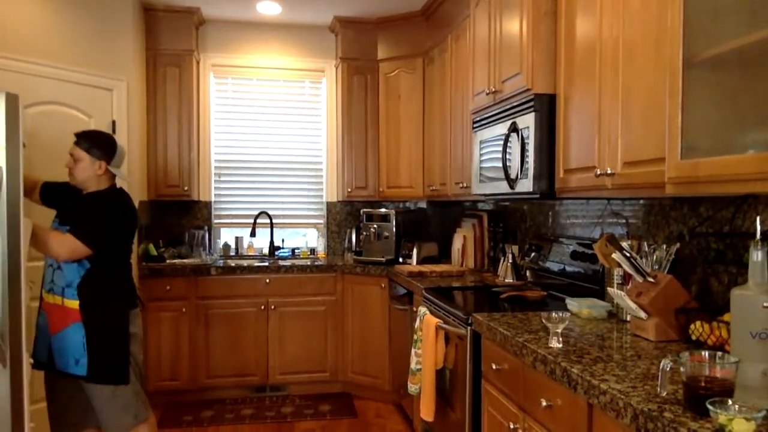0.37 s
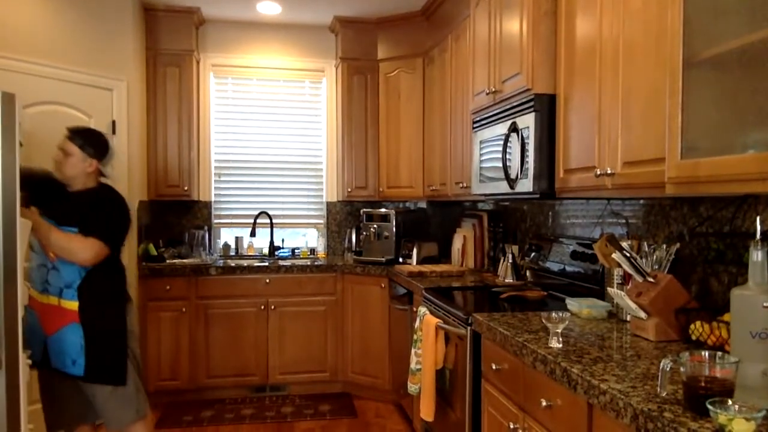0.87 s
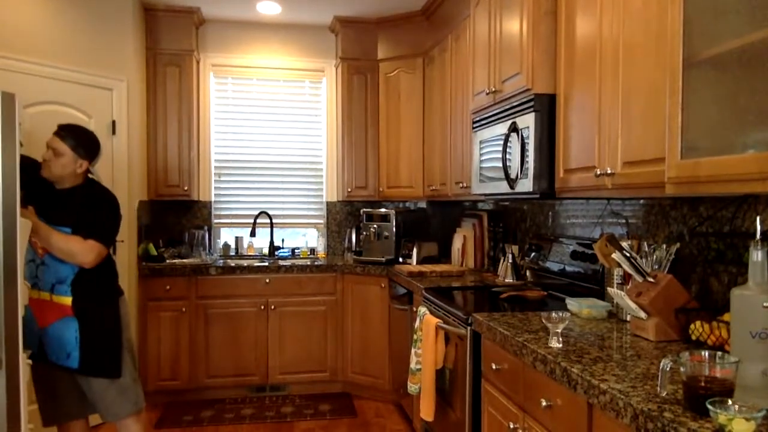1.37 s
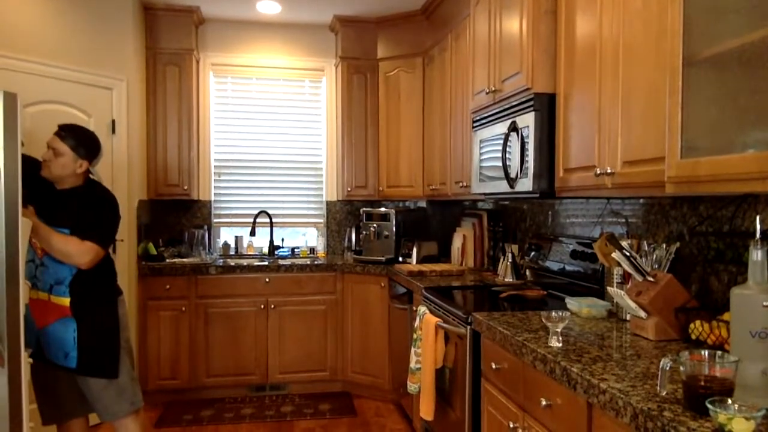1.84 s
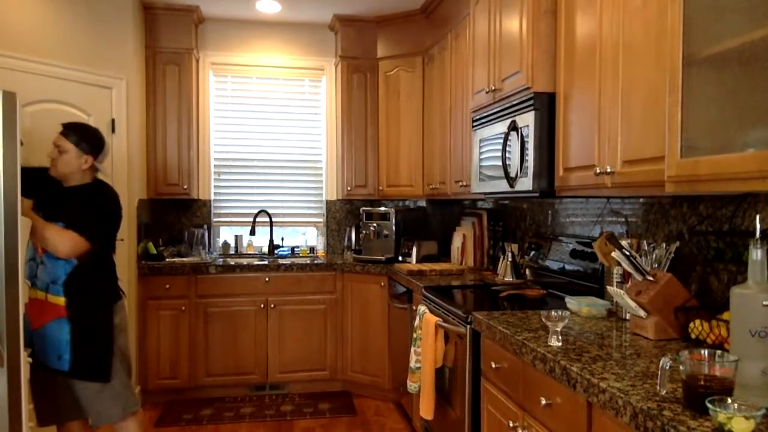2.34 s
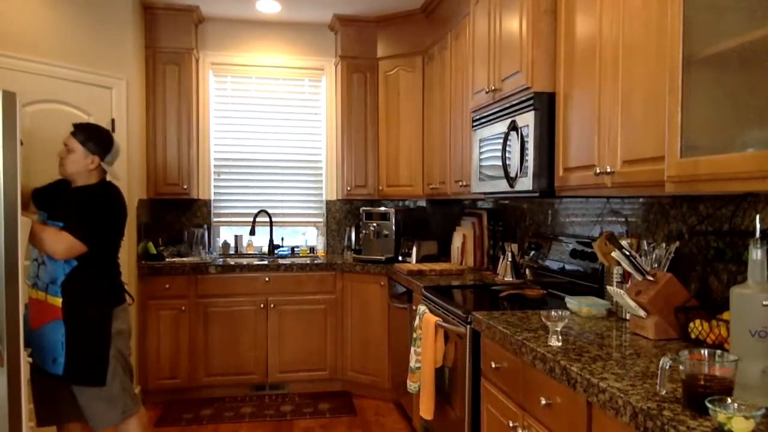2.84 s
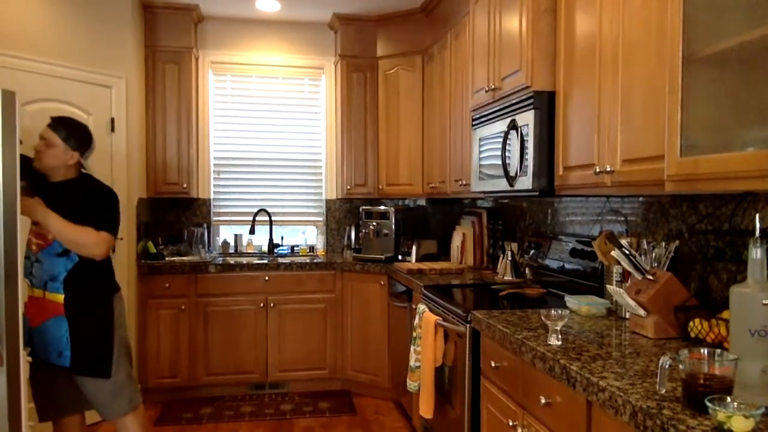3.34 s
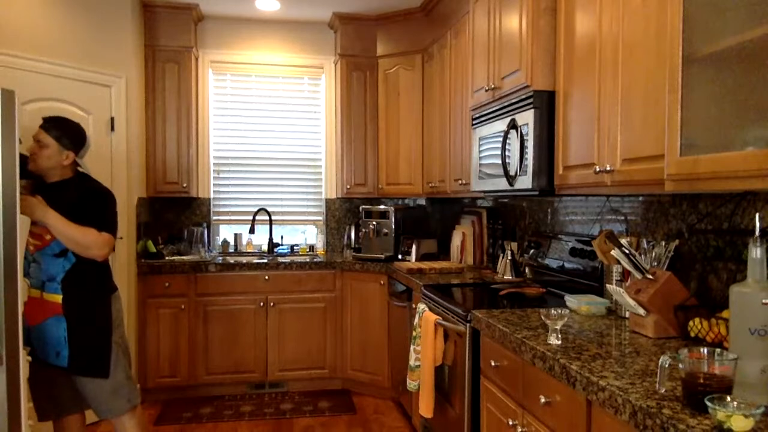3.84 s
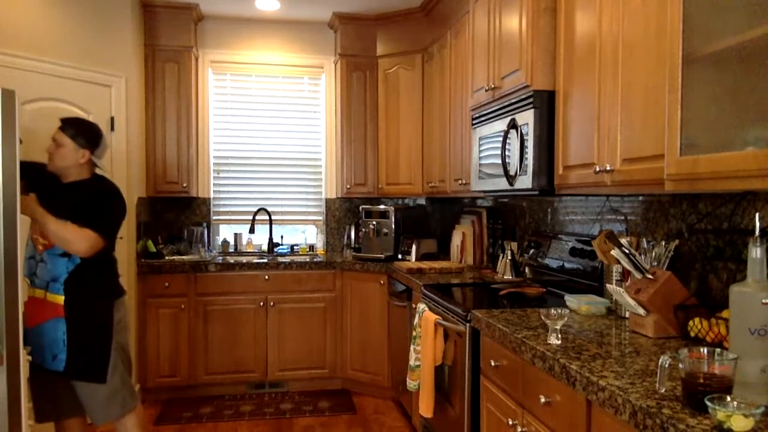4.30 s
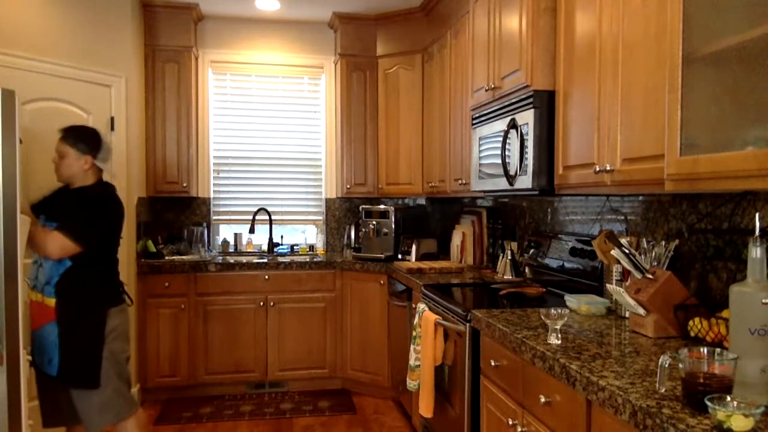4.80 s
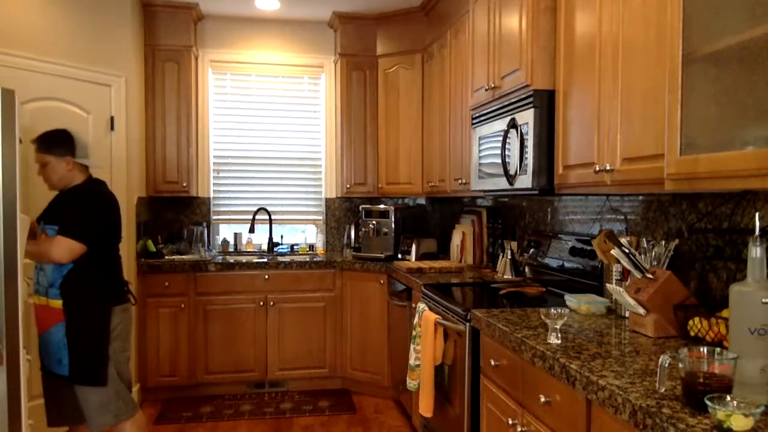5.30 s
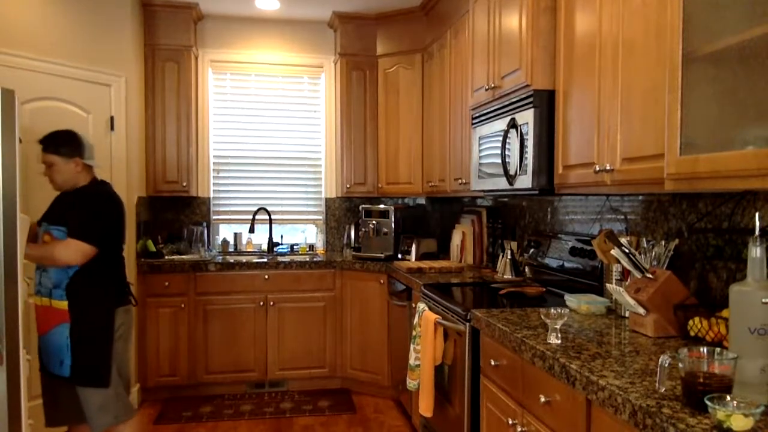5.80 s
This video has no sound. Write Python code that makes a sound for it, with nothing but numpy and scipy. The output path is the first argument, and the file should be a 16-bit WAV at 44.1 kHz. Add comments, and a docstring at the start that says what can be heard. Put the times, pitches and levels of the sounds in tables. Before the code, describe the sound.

In a hard home kitchen, a person at the freezer drops ice cubes into a metal shaker with sharp cracks and a short metallic ring. They rummage in the plastic bin with crunchy, knocking clatter, drop a few more, dig again, bump the bin, then drop a last handful. A distant microphone catches mostly room echo; the faint fridge hum is held down by noise suppression.

```python
"""In a hard kitchen, a hand digs ice cubes out of a plastic freezer bin and drops them into a steel tin.
A fridge hums as filtered noise. Cubes crack together and ring the tin's wall, base and air column.
Stirred ice is many tiny random contacts, with louder knocks on top, played through short resonances.
A distant mono microphone hears mostly room echoes; a noise suppressor cuts the tails and holds the hum down."""
import sys
import numpy as np
from scipy import signal
from scipy.fft import rfft, irfft
from scipy.io import wavfile
from scipy.ndimage import uniform_filter1d

SR = 44100
rng = np.random.default_rng(int(sys.argv[2]) if len(sys.argv) > 2 else 0)


def volts_from_db(level):
    """Convert decibel levels to linear amplitude ratios."""
    exponent = np.asarray(level, float) / 20
    return 10 ** exponent


def store_wav(level_fs):
    """Save 16-bit WAV to argv[1]."""
    pcm = np.round(np.clip(np.atleast_2d(level_fs), -1, 1) * 32767)
    wavfile.write(sys.argv[1], SR, pcm.T.astype(np.int16))


N = 272097   # length in samples

# how the suppressor treats each pitch: [f/Hz, threshold per analysis bin/dB, deepest cut/dB]
SUPPRESSOR_BANDS = [(149, -42, 13.5), (1080, -37, 12), (4020, -42, 20.5), (10000, -57.5, 19.5),
                    (16000, -58.5, 20)]


def at_hz(points, hz, column=1):
    """Reads a table between its rows, along a logarithmic pitch axis."""
    points = np.array(points)
    return np.interp(np.log(np.maximum(hz, 1)), np.log(points[:, 0]), points[:, column])


def in_time(tables):
    """Level over several spans; practically silent between them."""
    t, level = np.arange(N) / SR, np.full(N, -200.0)
    for s, db in map(np.transpose, tables):
        inside = (t >= s[0]) & (t <= s[-1])
        level[inside] = np.interp(t[inside], s, db)
    return level


def without_bass(x, hz):
    """Small bodies radiate little bass, so the lows are filtered off."""
    return signal.sosfilt(signal.butter(3, hz, "high", fs=SR, output="sos"), x)


def resonance(x, hz, width_hz):
    """A two-pole band that passes its middle pitch at about gain 1."""
    r = np.exp(-np.pi * width_hz / SR)
    feedback = [1, -2 * r * np.cos(2 * np.pi * hz / SR), r * r]
    return signal.lfilter([(1 - r * r) / 2, 0, (r * r - 1) / 2], feedback, x + 1e-18)


def ring(clicks, hz, t60):
    """A unit click starts a sine of about height 1, which falls by 60 dB in t60 seconds."""
    r, w = volts_from_db(-60 / (t60 * SR)), 2 * np.pi * hz / SR
    return signal.lfilter([0, np.sin(w)], [1, -2 * r * np.cos(w), r * r], clicks + 1e-18)


def fading(clicks, t60):
    """Each click jumps up at once, then falls by 60 dB in t60 seconds."""
    return signal.lfilter([1], [1, -volts_from_db(-60 / (t60 * SR))], clicks)


def grains(per_s, spread_db):
    """Random contacts of uneven size, scaled to an average (rms) level of 1."""
    sizes = volts_from_db(spread_db * np.minimum(rng.exponential(1, N), 3.0)) * rng.choice([-1, 1], N)
    x = sizes * (rng.random(N) < per_s / SR)
    return x / np.sqrt(np.mean(x ** 2) + 1e-20)


def spikes(seconds, db):
    """Single-sample clicks at the given times and levels."""
    x = np.zeros(N)
    x[np.round(np.asarray(seconds) * SR).astype(int)] = volts_from_db(db)
    return x


def clatter(colour, flow_db, flow_bright_db, knocks, knock_db, per_s, sharp):
    """Ice on ice: contacts are dealt out among short resonances; each knock is a noise burst on all of them."""
    knock_t60_s = 0.04                      # a knock is a short burst of contacts
    knock_spread_db, stir_spread_db = 1.5, 2.5   # no two cubes sound alike: random spread per band
    stir_colour_s = 0.06                    # time to drift from one random stir colour to the next
    bank_hz = np.geomspace(160, 16000, 28)
    s, level_db, bright_db = knocks

    contact, dealt = grains(per_s, spread_db=7.5), rng.integers(0, 7, N)
    burst = rng.standard_normal(N)
    own_db = knock_spread_db * rng.standard_normal((len(s), len(bank_hz)))
    patch_count = int(N / SR / stir_colour_s) + 2
    patch_db = stir_spread_db * rng.standard_normal((patch_count, len(bank_hz)))
    patch_position = np.arange(N) / (SR * stir_colour_s)

    gains, out = volts_from_db(at_hz(colour, bank_hz)), np.zeros(N)
    for k, hz in enumerate(bank_hz):
        # share of the brightness: none up to 1400 Hz, growing steadily per octave above
        treble = np.clip(np.log2(hz / 1400) / 4.7, 0, 1)
        clicks = spikes(s, level_db + knock_db + treble * bright_db + own_db[:, k])
        struck = fading(clicks, knock_t60_s) * burst
        drift_db = np.interp(patch_position, np.arange(patch_count), patch_db[:, k])
        rub_level = volts_from_db(flow_db + treble * flow_bright_db + drift_db)
        rubbed = contact * np.sqrt(7) * (dealt == k % 7) * rub_level
        out += gains[k] * (-1) ** k * resonance(struck + rubbed, hz, hz / sharp)
    # divide out the loudness of the whole bank
    return out / np.sqrt(np.sum(gains ** 2 * np.pi * bank_hz / sharp / SR))


def fridge_hum():
    """Fridge and room air: smooth noise plus one broad motor tone, raised to allow for the suppressor's cut."""
    # loudness before that raise: [t/s, level/dB]
    hum_level = [(0, -61), (0.199, -68.5), (1.15, -63), (2.65, -69), (3.25, -67), (4.85, -70.5),
                 (5.6, -67.5), (5.85, -69.5), (6.17, -79)]
    # tone colour of the air noise: [f/Hz, relative level/dB]
    air_colour = [(24, -58.5), (40, -20), (194, -14), (337, -7), (479, -14), (1370, -18.5), (1520, -13.5),
                  (1850, -12.5), (16000, -49.5)]
    white, hz = rng.standard_normal(N), np.fft.rfftfreq(N, 1 / SR)
    air = irfft(rfft(white) * volts_from_db(at_hz(air_colour, hz)), N)
    tone = resonance(white, 188, width_hz=20)
    hum = air / air.std() + volts_from_db(-6) * tone / tone.std()
    raised = irfft(rfft(hum) * volts_from_db(at_hz(SUPPRESSOR_BANDS, hz, column=2)), N)
    s, db = np.transpose(hum_level)
    return volts_from_db(np.interp(np.arange(N) / SR, s, db)) * raised


def settling(column, fade_db_per_s):
    """Cubes settling in the tin hold their level, then fade at a steady rate for a moment."""
    # settling after each drop: [start t/s, hold/s, crack level/dB, relative ring level/dB]
    settles = [(0.54, 0.1, -23.5, -62), (2.884, 0.07, -17.5, -66), (5.036, 0.31, -25, -71)]
    fade_s = 0.2
    spans = []
    for row in settles:
        start, held, level = row[0], row[0] + row[1], row[column]
        spans.append([(start, level), (held, level), (held + fade_s, level - fade_db_per_s * fade_s)])
    return in_time(spans)


def tin():
    """Clicks of ice crack and ring the wall, base and air column; settling cubes keep them ringing."""
    # clicks and ringing in the tin, loud or faint:
    # [t/s, then relative levels of crack/dB, wall ring/dB, base ring/dB, air column/dB]
    tin_clicks = [(0.219, -51, -48, -81, -79), (0.3314, -27.5, -33, -68, -84),
                  (0.3909, -56, -46, -73.5, -55.5), (0.4774, -8.5, -23.5, -71.5, -65.5),
                  (0.529, -3, -26.5, -15.5, -16.5), (0.6147, -3, -45, -14.5, -35),
                  (0.7139, -18, -33, -32.5, -81), (0.743, -38.5, -51.5, -22, -47),
                  (2.862, -27, -46.5, -61.5, -58.5), (2.872, 1.5, -14, -30, -23),
                  (2.9117, -21, -47, -28, -40.5), (4.9544, -31.5, -71.5, -35.5, -38),
                  (4.976, -22.5, -41, -44.5, -30.5), (5.054, -1.5, -46, -23.5, -12.5),
                  (5.1825, -5, -34.5, -28.5, -17.5), (5.2244, -2.5, -45.5, -36.5, -17.5),
                  (5.3223, -13.5, -23, -27, -21.5), (5.405, -24, -40.5, -46, -32.5)]
    # tone colour of the cracks: [f/Hz, relative level/dB]
    crack_colour = [(300, -58), (800, -34), (1400, -13), (2300, -5), (3500, -4.5), (5000, -7), (7500, -17),
                    (12000, -12.5), (16000, -18)]
    # ringing modes before the changes below: [f/Hz, relative level/dB, 60 dB fall time/s, part]
    modes = [(2843, 0, 0.088, "wall"), (3150, -14, 0.11, "wall"), (4100, -20.5, 0.39, "wall"),
             (4590, -8, 0.24, "wall"), (5850, -9.5, 0.18, "wall"), (7530, -9, 0.066, "wall"),
             (7930, -2.5, 0.014, "wall"), (11800, -18.5, 0.081, "wall"), (4850, -18.5, 0.98, "wall"),
             (2032.7, -5, 0.19, "base"), (3330, -15, 0.078, "base"), (3900, -2.5, 0.19, "base"),
             (6280, -10, 0.35, "base"), (7100, -5, 0.16, "base"), (9120, -11, 0.2, "base"),
             (11300, -21, 0.093, "base"), (12400, -17, 0.16, "base"), (12100, -16, .15, "base"),
             (12600, -14.5, .15, "base"), (13900, -25, .15, "base"), (607, -11, 0.32, "air"),
             (1142, -12, 0.2, "air"), (1420, -19.5, 0.2, "wall")]
    # how the tin's ringing changes at set times: [from t/s, share of fall time/ratio,
    # treble loss/dB per octave, air column pitch/ratio, air overtone level/dB]
    ring_changes = [(0, 0.44, -3, 0.98, -25.5), (.6, 1, 9.5, 1.05, -22), (2.5, 0.29, -3, 1.08, -9.5),
                    (2.9, 0.35, -5.5, 1.08, -13.5), (4.5, 0.28, 11, .96, 0.5)]
    mode_split = 0.0072   # a dented tin splits each steel mode in three, about this share of the pitch apart

    s, click_db, *part_db = np.transpose(tin_clicks)
    crack_db = settling(column=2, fade_db_per_s=259)
    ring_db = settling(column=3, fade_db_per_s=84.5)
    out = clatter(crack_colour, crack_db, 0, (s, click_db, 0), knock_db=5.0, per_s=430, sharp=5.06)

    rattle = grains(120, spread_db=5.0) * volts_from_db(ring_db)
    excited = {}
    for part, db, rattle_db in zip(["wall", "base", "air"], part_db, [-8, -2, -6]):
        excited[part] = spikes(s, db + 4.5) + rattle * volts_from_db(rattle_db)

    starts = [round(row[0] * SR) for row in ring_changes] + [N]
    for (_, share, loss_db, ratio, overtone_db), start, end in zip(ring_changes, starts, starts[1:]):
        span = slice(start, min(start + 2 * SR, N))
        own = np.arange(N)[span] < end   # only this stretch's clicks; their ringing may run past its end
        for hz, level_db, t60, part in modes:
            gain = volts_from_db(level_db - loss_db * max(np.log2(hz / 4200), 0))
            if part == "air" and hz > 900:
                gain *= volts_from_db(overtone_db)
            pitch = hz * (ratio if part == "air" else 1)
            for step in (-1, 0, 1):   # the air column is not split: its three copies coincide
                split = 1 + mode_split * (step + rng.uniform(-0.3, 0.18)) * (part != "air")
                out[span] += gain * ring(excited[part][span] * own, pitch * split, t60 * share)
    return out


def bin_digging():
    """Fingers stir the heap; single cubes knock louder and loosen others; a bump of the bin sounds lower."""
    # how hard the hand pushes, one list per dig: [t/s, level of the stirred ice/dB]
    digs = [
        [(1.25, -51), (1.27, -36.5), (1.33, -17), (1.47, -20.5), (1.64, -26), (1.9, -28), (2.0, -22.5),
         (2.19, -36.5), (2.28, -35.5)],
        [(3.31, -4.5), (3.34, -26.5), (3.454, -26.5), (3.586, -16), (3.694, -16), (3.77, -24.5), (3.894, -18),
         (3.98, -49.5)],
    ]
    # cubes knocking in the bin: [t/s, relative peak/dB, brightness/dB]
    bin_knocks = [(1, -22, 7), (1.259, -14, 18), (1.27, -10, 15), (1.285, -5, 14.5), (1.3, 0, 0.5),
                  (1.359, -2, 6.5), (1.422, -8, -8), (1.475, 9, -10), (1.653, 2.5, 4.5), (1.674, -4.5, 2),
                  (1.738, 10.5, -6), (1.808, 3, 7.5), (1.932, 6, 9), (1.959, 4.5, 7.5), (2.037, -6.5, -3),
                  (2.104, -0.5, -6), (2.178, 0.5, -3), (2.499, -19.5, -1), (3.302, -20, 16),
                  (3.314, 3, 7.5), (3.501, 0, 6.5), (3.579, 1, -2.5), (3.678, 1.5, -3), (3.806, 5, -0.5),
                  (3.879, 10, -11.5), (4.003, 1.5, -1), (4.146, 2, 2), (4.218, 7, -2.5), (4.249, -0.5, 4)]
    # tone colour of ice in the bin: [f/Hz, relative level/dB]
    bin_colour = [(160, -27), (300, -9), (450, -1.5), (700, 4), (1060, 4), (2000, -0.5), (2940, -6.5),
                  (4570, -5.5), (7840, -17.5), (15100, -20.5), (16000, -37.5)]
    # the bin is bumped and its heap slumps: [t/s, relative peak/dB, brightness/dB]
    bumps = [(4.481, 10, -4), (4.49, -10.5, 3), (4.524, -18, -1.5), (4.544, -30, 5)]
    # tone colour of the bump: [f/Hz, relative level/dB]
    bump_colour = [(100, -24.5), (210, -4.5), (400, 1), (800, 3.5), (1500, -5.5), (2200, -11),
                   (2900, -28.5), (4200, -14.5), (16000, -31)]

    push_db, knocks = in_time(digs), np.transpose(bin_knocks)
    # each knock loosens cubes that tumble on, 34 dB below it at first
    tumbling = fading(spikes(knocks[0], knocks[1] - 34), t60=0.35)
    power = volts_from_db(push_db) ** 2 + tumbling ** 2 + 1e-20
    pushed_share = volts_from_db(push_db) ** 2 / power
    # only pushed ice gets a treble lift: 7.5 dB at a medium push of -22.5 dB, slightly less when harder
    bright_db = pushed_share * (7.5 - 0.02 * (push_db + 22.5))
    stirred = clatter(bin_colour, 10 * np.log10(power), bright_db, knocks,
                      knock_db=-5.5, per_s=500, sharp=5.0)
    # the bump has knocks only: its stirring is silent
    bumped = clatter(bump_colour, -np.inf, 0, np.transpose(bumps), knock_db=-5.5, per_s=1, sharp=4.03)
    return stirred + bumped


def faint_ticks():
    """Brief narrow ticks, perhaps the fridge: each click rings at one pitch for a few milliseconds."""
    # [t/s, relative peak/dB, f/Hz]
    ticks = [(2.728, -43.5, 2643), (5.75, -54.5, 14100)]
    return sum(ring(spikes([s], db + 11.5), hz, t60=0.014) for s, db, hz in ticks)


def kitchen(x):
    """A weak direct path, then dense echoes that build up and mostly die faster in the treble."""
    # how long the echoes last: [f/Hz, 60 dB fall time/s]
    echo_t60 = [(150, 0.05), (600, 0.4), (2000, 0.52), (5000, 0.38), (10000, 0.21), (16000, 0.062)]
    direct_db, first_echo_s, build_up_s = -9.5, 0.0013, 0.0039
    t = np.arange(int(0.9 * SR)) / SR
    edges, white, tail = np.geomspace(60, 18000, 41), rng.standard_normal((2, len(t))), 0
    for k, (low, high) in enumerate(zip(edges, edges[1:])):
        band_filter = signal.butter(2, [low, high], "band", fs=SR, output="sos")
        band = signal.sosfilt(band_filter, white[k % 2])
        band = band * volts_from_db(-60 * t / at_hz(echo_t60, np.sqrt(low * high)))
        tail = tail + band * np.sqrt((high - low) / np.sum(band ** 2))
    tail = tail * np.clip((t - first_echo_s) / build_up_s, 0, 1)
    tail /= np.sqrt(np.sum(tail ** 2))
    tail[0] = volts_from_db(direct_db)
    return signal.fftconvolve(x, tail)[:N]


def scene():
    """Ice and ticks sound through the kitchen; the hum is added; both channels are alike."""
    ice = without_bass(tin(), 609) + without_bass(bin_digging(), 130)
    heard = fridge_hum() + kitchen(ice + faint_ticks())
    return np.array([heard, heard])


def suppress(x):
    """Noise suppressor: per band, whatever sinks under a threshold is turned down further, to a set depth."""
    slope, release_s, hop = 0.63, 0.0067, 128   # slope: extra dB of cut per dB under the threshold
    hz, _, z = signal.stft(x, SR, nperseg=512, noverlap=512 - hop)
    power = uniform_filter1d(np.abs(z) ** 2, size=9, axis=0)
    keep = np.exp(-hop / (release_s * SR))
    for i in range(1, power.shape[1]):   # opens at once, closes slowly
        closing = keep * power[:, i - 1] + (1 - keep) * power[:, i]
        power[:, i] = np.maximum(power[:, i], closing)
    under_db = at_hz(SUPPRESSOR_BANDS, hz)[:, None] - 10 * np.log10(power + 1e-20)
    deepest_db = at_hz(SUPPRESSOR_BANDS, hz, column=2)[:, None]
    gain = volts_from_db(-np.clip(slope * under_db, 0, deepest_db))
    return signal.istft(z * gain, SR, nperseg=512, noverlap=512 - hop)[1][:N]


def roll_off(x):
    """The treble ends steeply here."""
    return signal.sosfilt(signal.butter(12, 16510, fs=SR, output="sos"), x)


def record(dry):
    """One microphone on both channels: the suppressor works, then peaks beyond full scale are clipped."""
    mono = np.clip(suppress(dry[0]), -1, 1)
    return roll_off(np.array([mono, mono]))


dry = scene()
out = record(dry)
store_wav(out)
```